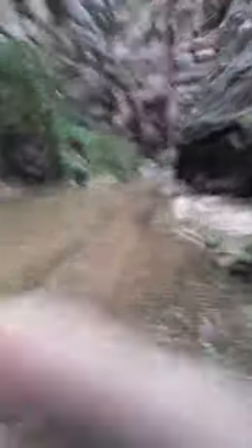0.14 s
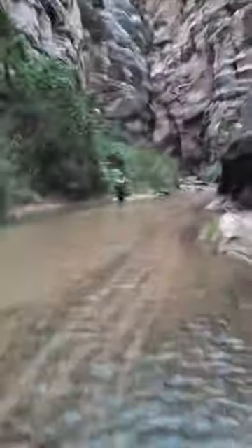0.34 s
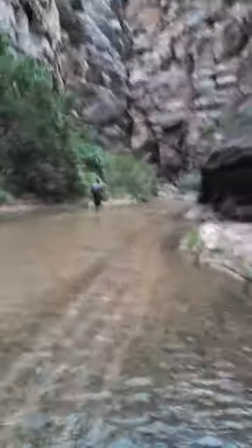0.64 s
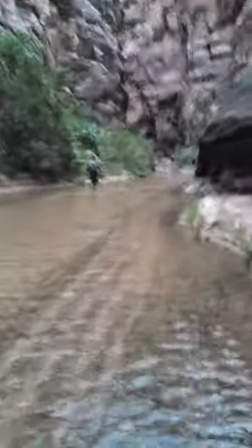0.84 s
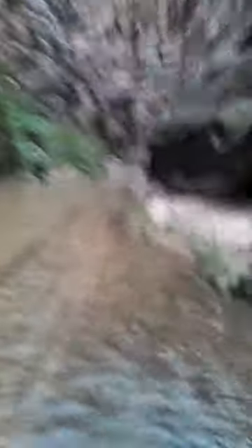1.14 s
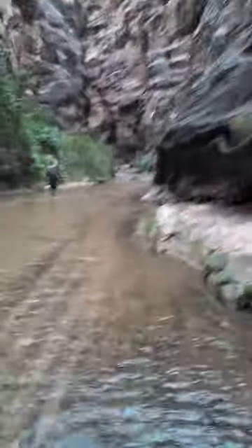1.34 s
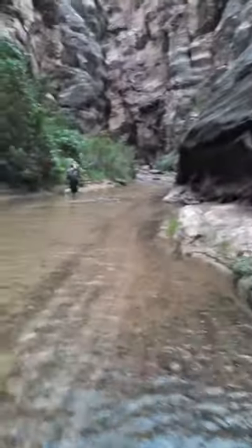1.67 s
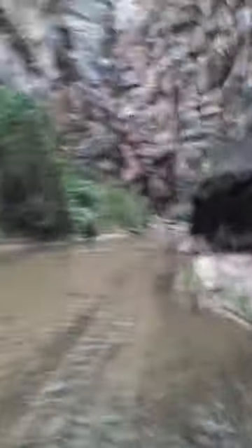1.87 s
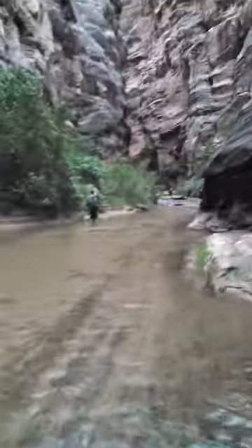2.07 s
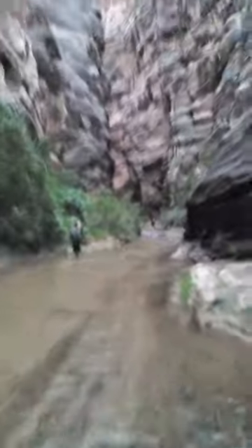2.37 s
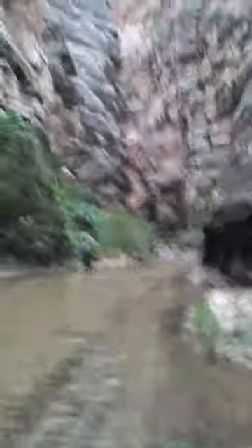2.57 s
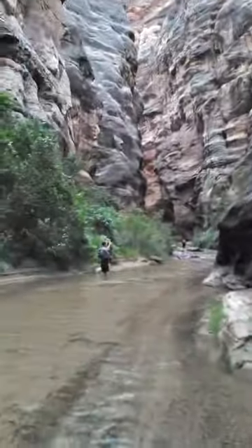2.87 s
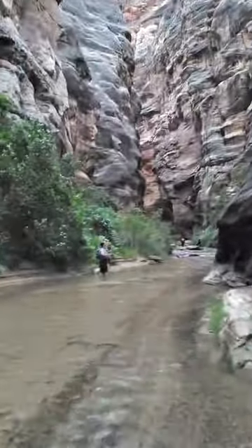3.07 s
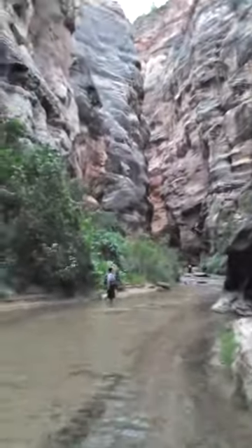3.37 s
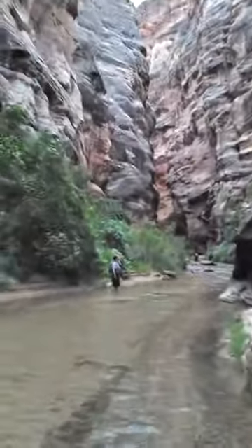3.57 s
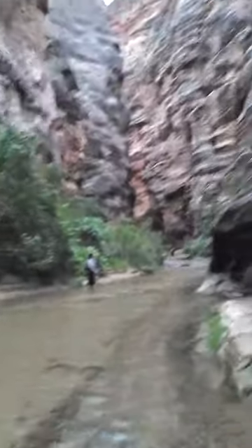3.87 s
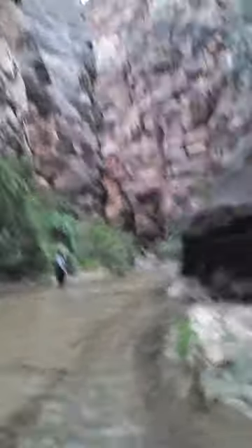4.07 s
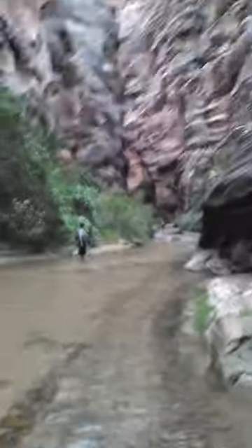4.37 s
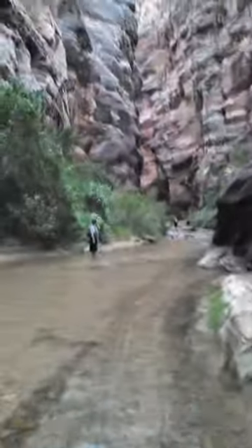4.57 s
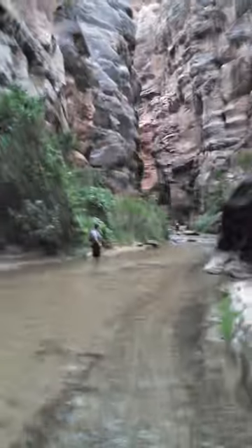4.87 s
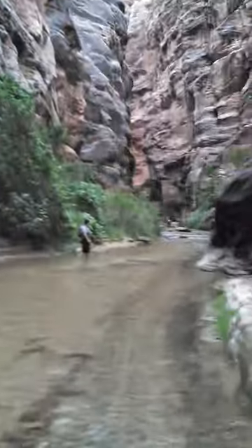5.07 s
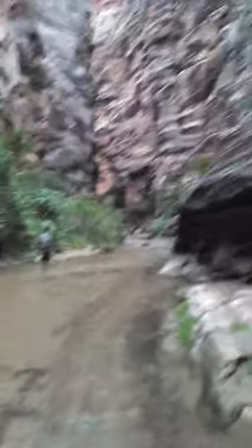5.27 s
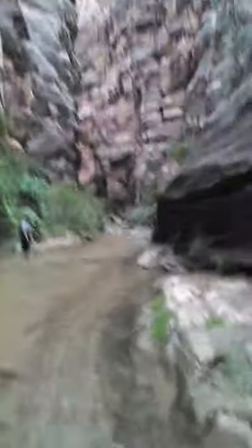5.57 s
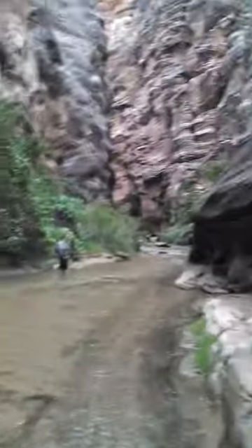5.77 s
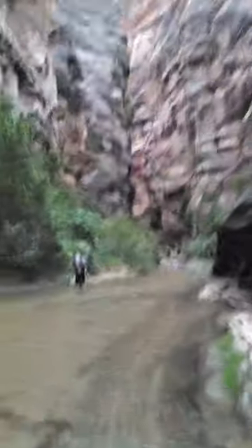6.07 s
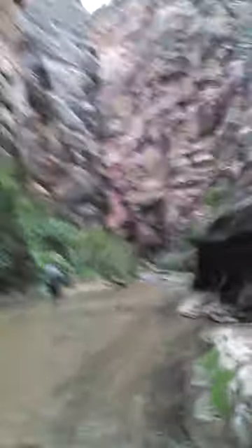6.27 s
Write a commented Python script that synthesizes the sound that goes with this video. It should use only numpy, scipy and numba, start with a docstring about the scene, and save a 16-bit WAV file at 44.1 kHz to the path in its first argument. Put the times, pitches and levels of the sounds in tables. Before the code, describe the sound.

The opening quarter second is silent, then quiet water is heard as someone wades a shallow river with a handheld phone. A faint stride at 0.4 s is followed by a light, bright splash at 1.1 s, with wind thumping sharply at 0.9 s. The stride at 1.6 s surges into strong churning and spray, with gulps and a clear plink; a hard overloaded knock at 1.9 s ducks the sound, which creeps back. Softer gurgling strides come near 2.5 and 3.1 s, with a crisp slap at 2.7 s. From 3.8 s the steps become fuller, bubbling low, then fizzing: 4.6 s with a big gulp and slaps around 4.9 s, 5.2 s with drips after, and the heaviest plunge at 5.9 s, spraying and dripping until the abrupt end at 6.4 s. Water settles between steps; low wind flutters and bumps on the right, strongest near 4.4 s and after 5.7 s.

```python
"""Wading through a shallow river

Each stride gurgles, churns and throws spray: swarms of ringing bubbles over dense noise, with gulps, drips
and slaps. Wind rumbles and thumps on one port of a phone held above the water, as low noise and short swings.
One hard knock, a leaking pressure step, overloads the input, so that the gain drops and creeps back.
The two ports are subtracted with a delay to aim left and right."""
import sys
import numpy as np
from numba import njit
from scipy import signal
from scipy.fft import rfft, irfft, next_fast_len
from scipy.io import wavfile

SR = 44100
rng = np.random.default_rng(int(sys.argv[2]) if len(sys.argv) > 2 else 0)


def wav_record(signal):
    """Record a signal, one row per channel, as 16-bit PCM in the file named by sys.argv[1]."""
    frames = np.transpose(np.atleast_2d(signal))
    bounded = np.clip(frames, -1, 1)
    # unit amplitude maps onto the largest positive 16-bit level
    quanta = np.round(bounded * 32767).astype(np.int16)
    wavfile.write(sys.argv[1], SR, quanta)


N = 283563
PORT_GAP = 16   # samples that sound needs from one port to the other

# spectrum of the finest bubbles and of splashing sheets: freq_hz, level_db
SPRAY = [(1200, -11.5), (2500, 6), (4000, 0), (6500, -3.5), (9000, -1), (11000, -11), (13000, 1.5),
         (15500, 3.5)]


def water():
    """Bubble resonance: three sizes of bubble follow the stride, each over a wash too dense to tell apart."""
    # spectra of large and of middling bubbles: freq_hz, level_db
    gurgle_spectrum = [(150, -12.5), (250, -4), (400, 0.5), (600, -3), (900, -22), (1300, -6)]
    churn_spectrum = [(300, -5.5), (600, -3), (1000, 1), (1400, 1), (1900, -1.5), (2500, -7), (4000, -16),
                      (7000, -50)]
    # level of the spray's top treble: time_s, level_db
    sheen_points = [(0.25, -2.5), (1.15, -0.5), (1.35, -2.5), (1.9, -3.5), (2.3, 3), (2.7, 2.5), (3.4, 1),
                    (3.9, 5), (4.3, 2), (4.9, -0.5), (5.6, -0.5), (6.43, -2)]
    sheen_hz = 11000   # the top treble starts here
    gurgle_gain, churn_gain, spray_gain = wading()

    gurgle = swarm(gurgle_spectrum, per_s=670, cycles=19.2, spread_db=0.0, rise=0.23,
                   aim=0.88, scatter=0.098, clump_db=3.0, cap=1.96)
    gurgle_wash = wash(gurgle_spectrum, own_db=-6.5, shadow_db=5)
    gurgle = rms_one(gurgle + from_db(-8.5) * gurgle_wash)

    churn = swarm(churn_spectrum, per_s=2800, cycles=18.0, spread_db=2.5, rise=0.63,
                  aim=0.98, scatter=0.63, clump_db=4.0, cap=5.6)
    churn_wash = wash(churn_spectrum, own_db=-2.0, shadow_db=-51)
    churn = rms_one(churn + from_db(2.0 + 2.0 * drift(21)) * churn_wash)

    fizz = swarm(SPRAY, per_s=9000, cycles=12.2, spread_db=4.5, rise=0.22,
                 aim=.7, scatter=1.2, clump_db=3.5, cap=4.05)
    flicker_db = 1.7 * drift(17)
    spray_wash = wash(SPRAY, own_db=5.0, shadow_db=-36)
    spray = rms_one(fizz + from_db(6.0 + flicker_db) * spray_wash)
    top = signal.sosfiltfilt(signal.butter(2, sheen_hz, "high", fs=SR, output="sos"), spray)
    sheen_db = curves(sheen_points)[0] + 1.1 * drift(11)
    spray = spray + (from_db(sheen_db) - 1) * top
    return gurgle_gain * gurgle + churn_gain * churn + spray_gain * spray


def wading():
    """Addition of powers: gains of gurgle, churn and spray, every stride over the settling water."""
    # one row a stride; the leg plunges, drags forward to a crest, holds, lifts out:
    # plunge_s, drag_s, hold_s, plunge gurgle_db, churn_db, spray_db, crest gurgle_db, churn_db, spray_db
    stride_rows = [(0.416, 0.025, 0.087, -57, -40, -36, -53, -40, -34),
                   (1.095, 0.17, 0.065, -48, -41, -31, -61, -43, -26),
                   (1.62, 0.25, 0.11, -57, -36, -38, -37, -30, -23),
                   (2.487, 0.14, 0.2, -39.5, -43, -39, -43, -41, -31),
                   (3.087, 0.27, 0.046, -36, -40, -44, -64, -33, -30.5),
                   (3.793, 0.34, 0.019, -42, -36.5, -42, -37.5, -33, -30),
                   (4.575, 0.22, 0.11, -37, -34, -41.5, -45, -35.5, -28),
                   (5.224, 0.27, 0.038, -35, -33.5, -36.5, -38, -33.5, -26),
                   (5.944, 0.32, 0.0091, -30.5, -32, -33.5, -41.5, -32, -24.5)]
    # water settling round the legs between strides: time_s, gurgle_db, churn_db, spray_db
    settling_points = [(0.25, -51, -41, -40), (0.7, -46.5, -40, -42), (0.95, -47.5, -37, -41),
                       (1.45, -40.5, -35.5, -41.5), (2.15, -40.5, -39, -49), (2.4, -52.5, -35.5, -38),
                       (2.95, -47, -41.5, -42.5), (3.3, -50, -52, -44), (3.55, -43, -39.5, -50),
                       (4.4, -43, -41, -46.5), (5.05, -44.5, -39, -44.5), (5.65, -38.5, -39.5, -38),
                       (5.85, -41, -38.5, -44), (6.43, -45.5, -42, -34.5)]
    # how far the sound slackens after the plunge, under a straight path to the crest: gurgle_db, churn_db, spray_db
    slack_db = (-0.5, -2, -0.5)
    # fall after the hold: gurgle_db_per_s, churn_db_per_s, spray_db_per_s
    lift_db_per_s = (117, 96, 106)
    attack_s, slack_s = 0.051, 0.16   # time of a 10 dB rise; from the plunge to the slackest point

    power = from_db(curves(settling_points)) ** 2
    for s, drag, hold, *db in stride_rows:
        end = s + drag + hold
        slack = min(slack_s / drag, .9)   # as a share of the drag
        for k, (plunge, crest) in enumerate(zip(db[:3], db[3:])):
            times = [s - 4 * attack_s, s, s + slack * drag, s + drag, end, end + 40 / lift_db_per_s[k]]
            slackest = plunge + slack * (crest - plunge) + slack_db[k]
            power[k] += swell(times, [plunge, slackest, crest, crest]) ** 2
    return np.sqrt(power)


def gulps():
    """Resonance of large bubbles that close below the surface and climb in pitch."""
    # large bubbles closing, at any time in the stride: start_s, strength_db, pitch_hz, cycles
    gulp_rows = [(.716, -22.5, 466, 16), (1.11, -21, 590, 11), (1.156, -15, 527, 16),
                 (1.164, -16.5, 457, 12), (1.252, -21.5, 365, 7.4), (1.281, -20, 290, 8.5),
                 (1.308, -23, 297, 22), (1.385, -22.5, 304, 18), (1.424, -23, 525, 15),
                 (1.692, -16.5, 218, 8.8), (1.738, -22, 614, 15), (1.831, -14, 426, 7.8),
                 (1.849, -14.5, 730, 16), (1.865, -13, 407, 8.9), (2.014, -17, 333, 12),
                 (2.035, -18, 415, 19), (2.348, -18.5, 573, 13), (2.506, -18, 440, 13),
                 (2.562, -15.5, 566, 17), (2.588, -13, 487, 5.5), (2.651, -20, 445, 10),
                 (3.077, -15.5, 410, 12), (3.369, -18.5, 554, 15), (3.517, -20.5, 626, 17),
                 (3.519, -21, 310, 10), (3.537, -19.5, 417, 21), (3.797, -24, 535, 12),
                 (3.859, -19.5, 490, 19), (3.875, -21.5, 244, 14), (3.906, -17.5, 606, 14),
                 (3.934, -19, 700, 17), (4.022, -19.5, 372, 11), (4.035, -18.5, 384, 11),
                 (4.052, -15, 360, 5.1), (4.079, -20, 308, 14), (4.108, -12, 416, 14),
                 (4.132, -12, 410, 5.6), (4.486, -20.5, 404, 28), (4.58, -18, 460, 18),
                 (4.591, -8, 442, 13), (4.615, -13, 362, 26), (4.817, -11, 493, 5.1),
                 (4.865, -20.5, 515, 35), (4.887, -17.5, 408, 32), (5.201, -19, 363, 8),
                 (5.236, -13, 445, 8), (5.249, -15, 373, 27), (5.28, -18.5, 673, 34), (5.284, -18, 500, 14),
                 (5.389, -19, 437, 18), (5.446, -19, 408, 14), (5.574, -21.5, 337, 13),
                 (5.907, -24, 337, 13), (5.944, -9, 370, 10.4), (5.969, -8.5, 400, 9.5),
                 (6.146, -17, 530, 17), (6.223, -15, 410, 9.1), (6.245, -14, 383, 6.8),
                 (6.272, -22, 550, 11)]
    s, db, hz, cycles = np.transpose(gulp_rows)
    count = len(s)
    ports = np.zeros((2, N))
    add_bubbles(ports, (s * SR).astype(np.int64), from_db(db), hz, cycles,
                np.full(count, .25), np.full(count, 13), .1)
    return ports


def drips():
    """Resonance of small clear bubbles that climb in pitch."""
    # single drops falling back: start_s, strength_db, pitch_hz
    drip_rows = [(.434, -23, 1100), (0.459, -26, 970), (1.729, -18, 1370), (1.8274, -15.5, 970),
                 (1.86, -6.5, 3040), (3.099, -22, 870), (3.1, -21, 2070), (3.252, -21, 890),
                 (3.798, -24, 1980), (3.915, -21, 856), (4.075, -19, 925), (5.283, -22, 1150),
                 (5.438, -21, 1000), (5.463, -14, 1160), (5.498, -9, 2210), (5.9686, -12.5, 1090),
                 (6.02, -20, 1050), (6.158, -16, 1130), (6.2235, -14, 1750), (6.249, -18, 1070)]
    s, db, hz = np.transpose(drip_rows)
    count = len(s)
    ports = np.zeros((2, N))
    add_bubbles(ports, (s * SR).astype(np.int64), from_db(db), hz, np.full(count, 22.0),
                np.full(count, .3), np.full(count, 12), .06)
    return ports


def slaps():
    """Impact noise: bursts that swell and die exponentially, some duller, some brighter."""
    # sheets of water landing: start_s, level_db, fall_ms, low_db (level under the split, relative to level_db)
    slap_rows = [(.635, -28.5, 21, 3), (1.2174, -11.5, 1.7, -11), (1.279, -28, 3.0, -4), (1.32, -24, 12, 7),
                 (1.8607, -32, 1.4, 0), (2.238, -34, 15, 11), (2.364, -36, 18, -10), (2.7047, -7, 1.9, -9),
                 (3.133, -27.5, 2.4, 11.5), (3.21, -31, 8, 4), (3.3325, -25, 1.8, 4),
                 (3.8777, -29, 1.2, -4), (4.1, -21, 8, 2), (4.134, -19, 1.5, -5), (4.29, -28.5, 19, 2),
                 (4.322, -27, 9.9, -4), (4.827, -19.5, 5.3, 10), (4.871, -18, 4.2, 0),
                 (4.8775, -11, 1.7, -11), (4.9, -14, 5.5, -6), (4.9064, -26, 1.5, 0), (5.482, -24, 1.5, -3),
                 (5.5116, -14, 4.1, -11), (5.672, -14, 1.5, -5), (5.695, -15, 3.8, -8),
                 (6.1247, -19, 1.5, 5), (6.1786, -23, 4.1, 0), (6.239, -32, 5.4, 3), (6.34, -23, 17, 4),
                 (6.385, -18, 1.5, -4)]
    split_hz, rise_share = 5000, 0.32   # the rise takes this share of the fall
    after_ms = np.arange(SR // 10) / SR * 1000
    envelopes = np.zeros((2, N))   # under and over the split
    for s, db, fall_ms, low_db in slap_rows:
        rise = 1 - np.exp(-after_ms / (rise_share * fall_ms))
        burst = from_db(db) * rise * np.exp(-after_ms / fall_ms)
        start = round(s * SR)
        envelopes[:, start:start + len(burst)] += burst[:N - start] * from_db([[low_db], [0]])
    noise = wash(SPRAY, own_db=2.5, shadow_db=-29)
    low = signal.filtfilt(*signal.butter(1, split_hz, fs=SR), noise)
    return envelopes[0] * low + envelopes[1] * (noise - low)


def wind_and_knock():
    """Local pressure: lumpy rumble, flutter, light air, eddies and the knock press on the right port alone."""
    # spectra of the rumble, of the flutter of strong gusts, of steady light air: freq_hz, level_db (per Hz)
    rumble_spectrum = [(20, -8), (60, 4), (120, 7), (200, -9), (350, -46), (700, -38)]
    flutter_spectrum = [(100, -6.5), (200, -1), (350, -17), (600, -30), (1000, -59)]
    breeze_spectrum = [(20, -1), (45, 13), (90, -6), (200, -28), (500, -60)]
    steady_db = gusts()
    gust_db = steady_db + 2.6 * np.tanh(drift(22) / 2)   # lumps of limited size
    # the flutter grows faster than the rumble, so strong gusts are brighter
    flutter = from_db(.5 * (gust_db + 28.0)) * coloured(flutter_spectrum)
    rumble = from_db(gust_db) * (coloured(rumble_spectrum) + flutter)
    breeze = from_db(-42.5) * coloured(breeze_spectrum)
    push = rumble + breeze + eddies(steady_db) + knock()
    # the inverse of the bass lift, which the lift later undoes
    numerator, denominator = bass_lift()
    return np.array([0 * push, signal.lfilter(denominator, numerator, push)])


def gusts():
    """Addition of powers: level of the rumble in dB, gusts over a calm floor."""
    # gusts on the port: start_s, length_s, start_db, end_db
    gust_rows = [(0.247, 0.037, -46, -43), (0.876, 0.043, -42, -22.5), (1.154, 0.048, -50, -39),
                 (2.06, 0.083, -28, -36), (2.352, 0.054, -36, -45), (2.62, 0.24, -33.5, -37.5),
                 (3.476, 0.2, -37.5, -28.5), (3.716, 0.35, -41, -34.5), (4.352, 0.13, -23.5, -33),
                 (4.688, 0.21, -32, -34), (5.174, 0.24, -39.5, -36), (5.695, 0.17, -29, -32.5),
                 (5.95, 0.28, -29.5, -31.5), (6.328, 0.086, -30.5, -35)]
    calm_db, rise_s, fall_db_per_s = -47.5, 0.029, 160   # rise_s is the time of a 10 dB rise
    power = from_db(calm_db) ** 2
    for s, length, first_db, last_db in gust_rows:
        times = [s - 4 * rise_s, s, s + length, s + length + 40 / fall_db_per_s]
        power = power + swell(times, [first_db, last_db]) ** 2
    return 10 * np.log10(power)


def eddies(gust_db):
    """Vortex pressure: short damped swings at set times, and further ones at chance times that follow the gust level."""
    # wind eddies at set times: time_s, strength_db, pitch_hz
    thump_rows = [(0.884, -3, 109), (0.895, 8, 302), (0.902, 5, 165), (0.912, 7, 237), (0.954, 2.5, 202),
                  (0.964, 1.5, 164), (2.078, 0, 120), (2.11, -7, 119), (2.6935, 2.5, 107), (2.714, -2, 124),
                  (3.471, -8, 125), (3.581, 1, 137), (3.596, 2.5, 194), (3.64, -19, 124),
                  (3.797, -5.5, 129), (3.93, -9, 155), (3.945, -6, 178), (4.008, -4, 89), (4.356, 6.5, 192),
                  (4.376, -6, 123), (4.39, 7, 242), (4.404, 10.5, 197), (4.424, -3, 80.3), (4.474, -9, 113),
                  (4.621, -8, 110), (4.681, 7.5, 190), (4.723, -1.5, 133), (4.792, -5, 99),
                  (5.207, -9, 180), (5.6945, 2, 98), (5.758, 7.5, 191), (5.769, 1, 85), (5.824, -3, 140),
                  (5.879, -8, 105), (5.992, 8, 162), (6.112, -0.5, 160), (6.15, 5, 146), (6.196, -3, 115),
                  (6.326, -8, 101), (6.404, -0.5, 155)]
    # further eddies at chance times, following their gust at 23 to 29 dB above its level
    per_s, over_gust_db, low_hz, high_hz = 15, 23, 60.3, 146
    draw = rng.random((N, 3))
    at = np.flatnonzero(draw[:, 0] < per_s / SR)
    chance_db = gust_db[at] + over_gust_db + 6 * draw[at, 1]
    chance_hz = low_hz * (high_hz / low_hz) ** draw[at, 2]
    chance_rows = np.transpose([at / SR, chance_db, chance_hz])
    s, db, hz = np.vstack([thump_rows, chance_rows]).T
    # a suck first, then a push near the listed time; the pitch sinks
    early = np.maximum(s - 0.58 / hz, 0) * SR
    count = len(s)
    ports = np.zeros((2, N))
    add_bubbles(ports, early.astype(np.int64), -from_db(db), hz, np.full(count, 3.6),
                np.full(count, -.3), np.zeros(count, np.int64), .11)
    return ports[0]


def knock():
    """Exponential relaxation: a sudden step of pressure leaks away."""
    start_s, level_db, fall_s = 1.8983, 21.5, 0.0012
    after = np.arange(N) / SR - start_s
    return from_db(level_db) * (after > 0) * np.exp(-np.maximum(after, 0) / fall_s)


def thin_hiss(level_db, above_hz):
    """Uncorrelated noise: white noise, unrelated at the two ports, high-passed to the very top."""
    high_pass = signal.butter(3, above_hz, "high", fs=SR, output="sos")
    return from_db(level_db) * signal.sosfilt(high_pass, rng.standard_normal((2, N)))


@njit(fastmath=True)
def add_bubbles(ports, at, size, hz, cycles, rise, lag, swell):
    """Damped oscillation: a sine swells, decays at 60 dB per its cycles and glides; a lag (samples) sets direction.
    A positive lag delays the left port, a negative one the right."""
    for k in range(len(at)):
        length = int(cycles[k] * SR / hz[k]) + 2
        phase, unborn, left = 0., 1., size[k]
        grows, dies = np.exp(-1 / (length * swell)), np.exp(-6.9 / length)
        # stops at three quarters of the length, 45 dB down
        for i in range(min(3 * length // 4, ports.shape[1] - at[k] - 40)):
            phase += 2 * np.pi * hz[k] / SR * (1 + rise[k] * i / length)
            v = left * np.sin(phase) * (1 - unborn)
            unborn, left = unborn * grows, left * dies
            ports[0, at[k] + i + max(lag[k], 0)] += v
            ports[1, at[k] + i + max(-lag[k], 0)] += v


def swarm(spectrum, per_s, cycles, spread_db, rise, aim, scatter, clump_db, cap):
    """Random superposition: bubbles born in clumps, each from its own direction; aim 1 is in line with the right port.
    The largest are cap times the spread over the smallest; rise is the steepest climb."""
    birth_chance = per_s * from_db(clump_db * drift(14)) / SR
    at = np.flatnonzero(rng.random(N) < birth_chance)
    draw = rng.random((N, 4))[at]
    low, high = spectrum[0][0], spectrum[-1][0]
    hz = low * (high / low) ** draw[:, 0]
    # pitches even on a log axis, each ringing so many cycles, lose energy per Hz as pitch squared: times hz
    excess_db = -spread_db * np.maximum(np.log(draw[:, 1]), -cap)
    size = from_db(at_hz(spectrum, hz) + excess_db) * hz
    lag = PORT_GAP * np.clip(aim + scatter * (2 * draw[:, 2] - 1), -1, 1)
    ports = np.zeros((2, N))
    add_bubbles(ports, at, size, hz, cycles * (.5 + draw[:, 3]), rise * draw[:, 3], lag.astype(np.int64), .08)
    return rms_one(ports)


def wash(spectrum, own_db, shadow_db):
    """Partial coherence: direct noise reaches the right port first, scattered noise differs at each port.
    The hand round the phone alters the scattered part in the low treble, by about shadow_db."""
    direct = coloured(spectrum)
    scattered = from_db(own_db) * np.array([coloured(spectrum), coloured(spectrum)])
    low_treble = signal.lfilter(*signal.butter(1, [1900, 3300], "band", fs=SR), scattered)
    scattered = scattered - (1 - from_db(shadow_db)) * low_treble
    return rms_one(np.array([np.roll(direct, PORT_GAP - 1), direct]) + scattered)


def from_db(db):
    """Logarithmic level: decibels to gain."""
    return 10 ** (np.asarray(db) / 20)


def rms_one(x):
    """Mean-square normalisation: scale to rms 1."""
    return x / np.sqrt(np.mean(x ** 2) + 1e-20)


def curves(rows):
    """Linear interpolation: table columns after the time as curves, one value a sample."""
    s, *columns = np.transpose(rows)
    return [np.interp(np.arange(N) / SR, s, c) for c in columns]


def at_hz(points, hz):
    """Logarithmic frequency: read a spectrum in dB on a log axis."""
    point_hz, point_db = np.array(points).T
    return np.interp(np.log(hz), np.log(point_hz), point_db)


def drift(rate_hz):
    """Low-passed chance: slow random motion of rms 1, made at one value per 40 samples."""
    r = np.exp(-80 * np.pi * rate_hz / SR)
    chance = rng.standard_normal(N // 40 + 2002)
    slow = signal.lfilter([1], [1, -2 * r, r * r], chance)[2000:]   # settled part
    return np.interp(np.arange(N) / 40, np.arange(len(slow)), rms_one(slow))


def coloured(spectrum):
    """Spectral shaping: white noise weighted to a spectrum in dB per Hz; rms 1."""
    size = next_fast_len(N)
    hz = np.maximum(np.arange(size // 2 + 1) * SR / size, 1)
    white = rfft(rng.standard_normal(size))
    return rms_one(irfft(white * from_db(at_hz(spectrum, hz)), size)[:N])


def swell(times, levels_db):
    """Exponential envelope: a gain through points in dB, fading in from and out to 40 dB under its ends."""
    levels_db = [levels_db[0] - 40, *levels_db, levels_db[-1] - 40]
    first, last = max(int(times[0] * SR), 0), min(int(times[-1] * SR), N)
    span = np.arange(first, last)
    gain = np.zeros(N)
    gain[span] = from_db(np.interp(span / SR, times, levels_db))
    return gain


def bass_lift():
    """Gradient equalisation: a shelf that restores the bass lost by subtracting the ports."""
    zero_hz, pole_hz = 900, 25
    return [1, -np.exp(-2 * np.pi * zero_hz / SR)], [1, -np.exp(-2 * np.pi * pole_hz / SR)]


def port_colour(x):
    """Frequency response: the two ports favour different parts of the treble."""
    # left port's sensitivity over the right's: freq_hz, level_db
    tilt_points = [(1200, 0.45), (3500, 2.5), (9000, 2.5), (10300, 7), (13000, -6.5), (15500, -7)]
    size = next_fast_len(N)
    tilt_db = at_hz(tilt_points, np.maximum(np.arange(size // 2 + 1) * SR / size, 1))
    return irfft(rfft(x, size) * from_db([tilt_db / 2, -tilt_db / 2]), size)[:, :N]


def scene():
    """Superposition: pressure of river, wind, knock and hiss at the left and right port."""
    river = water() + gulps() + drips() + slaps()
    # bubbles send out little below 187 Hz
    river = signal.sosfilt(signal.butter(3, 187, "high", fs=SR, output="sos"), river)
    return port_colour(river) + wind_and_knock() + thin_hiss(level_db=-46, above_hz=17500)


def gain_control(x, threshold_db, release_db_s, attack_s):
    """Compression: level above the threshold is taken back fast and given back slowly."""
    ramp = release_db_s * np.arange(N) / SR
    peak_db = 20 * np.log10(np.abs(x).max(axis=0) + 1e-9)
    over = np.maximum(peak_db - threshold_db, 0)
    held = np.maximum.accumulate(over + ramp) - ramp
    r = np.exp(-1 / (attack_s * SR))
    return x * from_db(-signal.lfilter([1 - r], [1, -r], held))


def record(dry):
    """Delay-and-subtract directivity, then bass lift, resonant rumble cut, gain control, overload and top cut."""
    cut_hz, sharpness = 60, 2.4
    start_s, top_hz = 0.2252, 15480   # the input opens; nearly nothing passes above top_hz
    late_other = np.pad(dry, ((0, 0), (PORT_GAP, 0)))[::-1, :N]
    x = signal.lfilter(*bass_lift(), dry - late_other)
    left_bass = signal.lfilter(*signal.butter(1, 330, fs=SR), x[0])
    x = np.array([x[0] - .23 * left_bass, x[1]])   # the left side is lifted a little less
    x = signal.lfilter(*signal.butter(1, 60, "high", fs=SR), x)
    cut = 2 * np.pi * cut_hz
    x = signal.lfilter(*signal.bilinear([1, 0, 0], [1, cut / sharpness, cut ** 2], SR), x)
    x = gain_control(x, threshold_db=4.0, release_db_s=14, attack_s=0.0031)
    x = x * (np.arange(N) > start_s * SR)
    overloaded = np.clip(x, -1, 1)
    return signal.sosfilt(signal.ellip(12, 1, 85, top_hz, fs=SR, output="sos"), overloaded)


dry = scene()
out = record(dry)
wav_record(out)
```